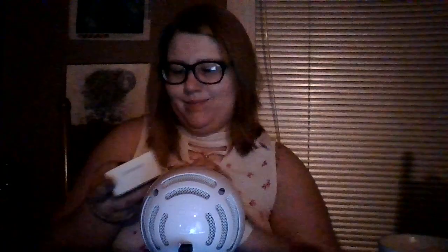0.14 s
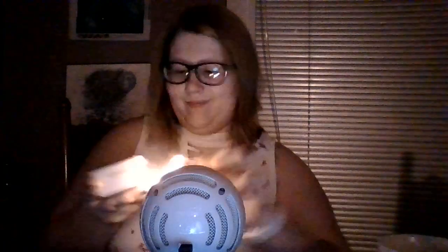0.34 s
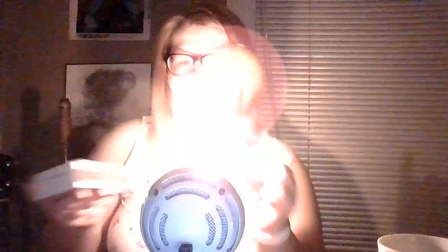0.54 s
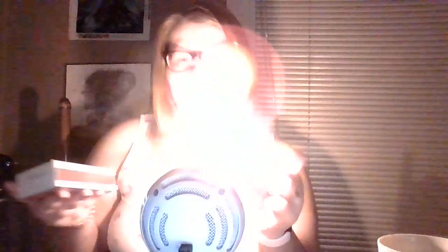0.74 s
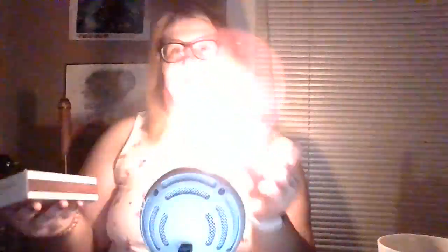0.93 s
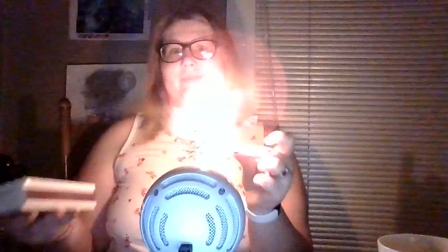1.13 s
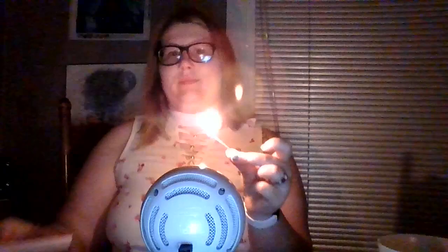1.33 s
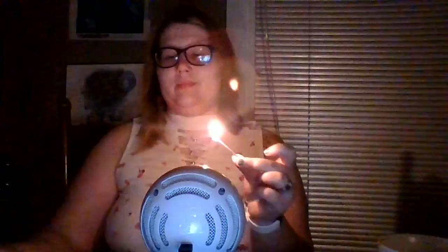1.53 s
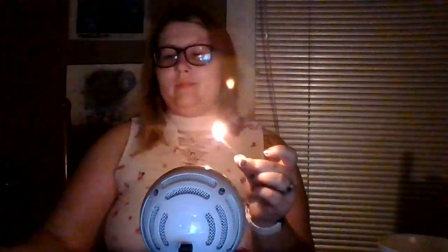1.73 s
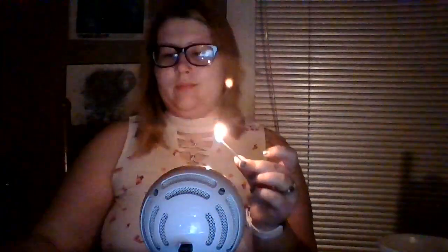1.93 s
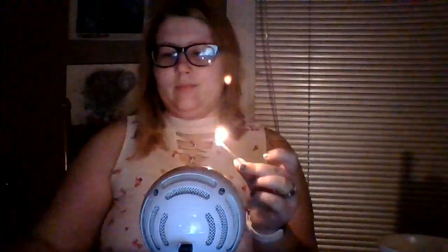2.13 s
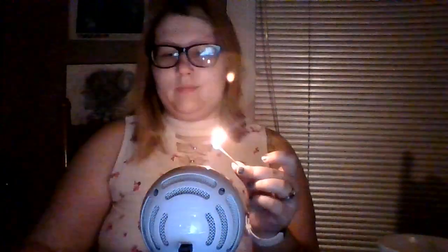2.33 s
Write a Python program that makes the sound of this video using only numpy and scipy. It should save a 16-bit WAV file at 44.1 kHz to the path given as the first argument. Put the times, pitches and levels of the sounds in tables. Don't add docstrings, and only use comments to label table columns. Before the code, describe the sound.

Close to the microphone in a quiet, humming room, a match scrapes quickly over grit, snaps alight with a pop, fizzes and spits for under a second, then matches rattle and the box thumps onto a table.

```python
import sys
import numpy as np
from scipy import signal
from scipy.fft import rfft, irfft
from scipy.io import wavfile
from scipy.ndimage import uniform_filter1d

SR = 44100
rng = np.random.default_rng(int(sys.argv[2]) if len(sys.argv) > 2 else 0)


def decibels_to_gain(level_db):
    exponent = np.asarray(level_db, float) / 20
    return 10 ** exponent


def materialize(psi):
    bounded = np.clip(np.atleast_2d(psi).T, -1, 1)
    quanta = np.round(bounded * 32767).astype(np.int16)
    wavfile.write(sys.argv[1], SR, quanta)


N = 103635
T = np.arange(N) / SR


def noise():
    return rng.standard_normal(N)


def evened(x):
    return x / np.sqrt(np.mean(x ** 2) + 1e-30)


def read(points, hz):
    f, value = np.transpose(points)
    return np.interp(np.log(hz + 1), np.log(f + 1), value)


def coloured(x, points, extra=0):
    hz = np.fft.rfftfreq(N, 1 / SR)
    low_cut = np.minimum(hz / points[0][0], 1) ** 2
    gain = decibels_to_gain(read(points, hz)) * low_cut * (hz < 16000) * (1 + extra)
    return evened(irfft(rfft(x) * gain, N))


def level(curve):
    s, db = np.transpose(curve)
    return decibels_to_gain(np.interp(T, s, db, left=-150, right=-150))


def ring(start, hz, db, t60, rise=0.0049):
    t = np.maximum(T - start, 0)
    return decibels_to_gain(db - 60 * t / t60) * (1 - np.exp(-(t / rise) ** 2)) * np.sin(2 * np.pi * hz * t)


def burst(start, fall, rise=0.000597):
    t = np.maximum(T - start, 0)
    return (1 - np.exp(-(t / rise) ** 2)) * np.exp(-t / fall)


def arch(start, length):
    return np.sin(np.pi * np.clip((T - start) / length, 0, 1)).clip(0)


def grains(per_s, spread_db):
    size = decibels_to_gain(spread_db * np.minimum(rng.exponential(1, N), 4)) * noise()
    return size * (rng.random(N) < per_s / SR)


def resonate(x, hz, width):
    turn = np.exp(2j * np.pi * hz * T)
    r = np.exp(-np.pi * width / SR)
    return 2 * (turn * signal.lfilter([1 - r], [1, -r], x / turn)).real


def resonate_twice(x, hz, width):
    return resonate(resonate(x, hz, width), hz, width)


def slow(span):
    size = max(int(span * SR), 2)
    return evened(uniform_filter1d(uniform_filter1d(noise(), size), size))


# pitch_hz, width_hz, depth (0 to 1)
PATH_NOTCHES = [(1800, 400, .6), (3300, 300, .5), (5400, 500, .65), (10500, 300, .65), (12100, 300, .65)]


def shadowed(x):
    hz = np.fft.rfftfreq(N, 1 / SR)
    dips = [1 - min(depth, .95) / (1 + (2 * (hz - f) / w) ** 2) for f, w, depth in PATH_NOTCHES]
    return irfft(rfft(x) * np.prod(dips, axis=0), N)


# pitch_hz, time_to_fall_60_db_s
ROOM_FADE = [(200, .35), (1000, .45), (4000, .38), (12000, .16)]


def room(x):
    late = rng.standard_normal(SR) * (np.arange(SR) > 300)
    hz, t, z = signal.stft(late, SR, nperseg=256)
    tail = signal.istft(z * decibels_to_gain(-60 * t / read(ROOM_FADE, hz)[:, None]), SR, nperseg=256)[1]
    return signal.fftconvolve(x, tail / np.linalg.norm(tail))[:N]


# pitch_hz, level_db (rms)
HUM_TONES = [(59.2, -56.5), (118.4, -69), (177.6, -82.5), (242.2, -75.5)]
# pitch_hz, level_db (per Hz)
HISS_TONE = [(60, -2), (200, -11.5), (570, -23), (1100, -19.5), (2000, -32), (5500, -39.5), (7800, -37.5),
             (15600, -43)]
# pitch_hz, level_db (per Hz)
ECHO_TONE = [(180, -46), (300, -8), (493, -11), (851, -2), (1940, -14), (3040, -25), (8200, -33),
             (15600, -54)]


def background():
    hum = 0
    for hz, db in HUM_TONES:
        waver_db = 1.6 * slow(span=0.089)
        hum = hum + decibels_to_gain(db + 3 + waver_db) * np.cos(2 * np.pi * hz * T + rng.uniform(0, 2 * np.pi))
    hiss_db = -65.5 - 2 * (T < .222)
    hiss = decibels_to_gain(hiss_db) * shadowed(coloured(noise(), HISS_TONE))
    rumble = decibels_to_gain(-64) * evened(resonate_twice(noise(), hz=28, width=20))
    echo = decibels_to_gain(-55.5 - 136.5 * T) * coloured(noise(), ECHO_TONE)
    return hum + hiss + rumble + echo


# start_s, length_s, pitch_hz, level_db
LANDING = [
    (1.8004, .036, 130, -42),
    (1.806, .036, 64, -40),
]
# start_s, pitch_hz, level_db, time_to_fall_60_db_s
TABLE_SWAY = [
    (1.841, 48, -46, 0.26),
    (1.866, 28, -45, 0.62),
    (1.923, 124, -44, 0.19),
    (1.94, 42, -44, .3),
    (2.023, 23, -41, 1.5),
    (2.27, 21, -46, 1.7),
]


def table():
    thump = 0
    for s, length, hz, db in LANDING:
        thump = thump + decibels_to_gain(db) * arch(s, length) * np.sin(2 * np.pi * hz * (T - s))
    return thump + sum(ring(*row) for row in TABLE_SWAY)


# start_s, level_db (peak), pitch_hz, brightness_db
KNOCKS = [(1.133, -67, 1110, -8), (1.223, -59.5, 1080, -34.5), (1.287, -44.5, 866, -20.5),
          (1.29, -44.5, 790, -18), (1.346, -50, 1010, -26), (1.491, -54, 765, -14.5),
          (1.497, -50, 950, -23), (1.514, -53, 1069, -21), (1.742, -42, 1075, -46.5),
          (1.7952, -41.5, 1254, -17.5), (1.797, -40.5, 700, -45), (2.287, -77.5, 688, -8.5)]
# start_s, length_s, level_db
SLIDES = [
    (1.309, 0.056, -71.5),
    (1.402, 0.062, -74),
    (1.476, 0.062, -69),
    (1.839, 0.11, -61.5),
    (1.949, 0.074, -69.5),
    (2.026, 0.0667, -63),
    (2.16, 0.055, -67.5),
    (2.227, 0.091, -71.5),
]
# pitch_hz, level_db (per Hz)
CARDBOARD_TONE = [(240, -26), (400, -14), (1230, -5), (1720, -14.5), (1940, -6.5), (2370, -15),
                  (6040, -20.5), (8210, -19), (15600, -34)]


def handling():
    thud_noise = noise()
    tick = coloured(noise(), CARDBOARD_TONE)
    tick_s = .004
    out = decibels_to_gain(-52) * tick * burst(2.3482, tick_s)
    for s, db, hz, bright_db in KNOCKS:
        knock = thud_noise * burst(s, fall=.004, rise=.0008)
        body = resonate_twice(knock, hz, 330)
        body = body + .4 * resonate_twice(knock, 1180, 260)
        bright = decibels_to_gain(bright_db + 6) * tick * burst(s, tick_s)
        out += decibels_to_gain(db) * (body / abs(body).max() + bright)
    slide = sum(decibels_to_gain(db) * np.sqrt(arch(s, length)) for s, length, db in SLIDES)
    rustle = shadowed(coloured(grains(per_s=14000, spread_db=0.82), CARDBOARD_TONE))
    return out + slide * rustle * decibels_to_gain(1.5 * slow(span=.008))


# time_s, level_db
BURNING = [
    (.25, -48),
    (.36, -59.5),
    (.46, -58.5),
    (.70, -54),
    (.80, -56),
    (.812, -58.5),
    (.845, -59),
    (.908, -67.5),
    (.925, -81),
]
# pitch_hz, level_db (per Hz)
FIZZ_TONE = [(88, -45.5), (150, 1), (501, -6), (1250, -2), (1740, -8), (2660, -6.5), (5260, -12),
             (7040, -8.5), (15600, -15)]
# pitch_hz, width_hz, level_db
REFLECTIONS = [(1340, 390, -5.5), (2670, 67, -1.5), (4260, 140, -8), (4784, 86, 1), (7260, 350, -3.5),
               (8500, 120, -7.5), (8410, 130, -1.5), (9730, 120, -22), (11300, 490, -5.5), (13100, 46, -10)]
# start_s, level_db (peak)
SPIT_TIMES = [
    (0.4834, -46),
    (0.5294, -44),
    (0.6938, -42),
    (0.8474, -42.5),
    (0.9074, -43),
]


def flare():
    hz = np.fft.rfftfreq(N, 1 / SR)
    loudest_db = np.max(read(FIZZ_TONE, hz))
    peaks = 0
    for f, width, db in REFLECTIONS:
        height = decibels_to_gain(db - loudest_db - read(FIZZ_TONE, f))
        peaks = peaks + height / np.sqrt(1 + (2 * (hz - f) / width) ** 4)
    hiss = coloured(noise(), FIZZ_TONE, decibels_to_gain(-7.5) * peaks)
    spits = sum(decibels_to_gain(db - 10.5) * burst(s, fall=.003) for s, db in SPIT_TIMES)
    flicker = decibels_to_gain(slow(span=.006))
    return hiss * (level(BURNING) * flicker + spits)


# time_s, level_db
PRESSURE = [
    (.21, -53),
    (.222, -40),
    (.2235, -24.5),
    (.2295, -23),
    (.231, -14),
    (.2352, -18),
    (.237, -8.5),
    (.241, -9),
    (.2465, -29),
]
# pitch_hz, level_db
GRIT_TONE = [(150, -14), (450, -19), (1100, -11), (2200, -10), (4600, -6), (8300, -2), (10400, -7),
             (14300, -5)]
# pitch_hz, level_db
APPROACH_TONE = [(700, -14), (1100, 0), (2500, -6), (5000, -10), (15000, -24)]
# start_s, level_db
STICK_SLIPS = [
    (.2025, -36),
    (.2095, -29),
    (.2128, -26),
    (.2168, -28),
    (.2208, -26),
    (.2265, -32),
    (.2375, -29),
    (.2565, -32),
]
# pitch_hz, level_db, time_to_fall_60_db_s
BOX_TONES = [(800, -9, .025), (1050, 0, .028), (1200, 3, .028), (1400, -4, .025), (1730, -12, .02),
             (2400, -18, .02)]


def strike():
    start_s, start_db = PRESSURE[0]
    before = (T < start_s) * decibels_to_gain(start_db) * np.exp(-np.maximum(start_s - T, 0) / .008)
    afterburn = (T > .2465) * decibels_to_gain(-39) * np.exp(-np.maximum(T - .294, 0) / .012)
    push = level(PRESSURE) + before + afterburn
    grit = push * coloured(grains(per_s=24000, spread_db=1.5), GRIT_TONE)
    approach = decibels_to_gain(-40) * np.exp(-abs(T - .222) / .0095) * coloured(noise(), APPROACH_TONE)

    box = 0
    for s, db in STICK_SLIPS:
        for hz, mode_db, t60 in BOX_TONES:
            box = box + ring(s, hz, db + mode_db, t60, rise=.0012)

    pop = ring(.232, hz=310, db=-27, t60=.05)
    gust = decibels_to_gain(-34) * burst(.228, fall=.035, rise=.005) * evened(resonate_twice(noise(), hz=70, width=160))
    puff = gust - ring(.248, hz=16, db=-25, t60=.25)
    return grit + approach + pop, box, puff


def scene():
    scrape, box, puff = strike()
    near = scrape + shadowed(flare()) + handling()
    echoes = decibels_to_gain(-17.5) * room(near + decibels_to_gain(-0.5) * box)
    return (near + box + echoes + puff + table() + background())[None]


def top_cut(x):
    return signal.sosfilt(signal.butter(12, 15780, fs=SR, output="sos"), x)


def record(dry):
    knee = 1.5
    mix = knee * np.tanh(dry / knee)
    return top_cut(mix)


dry = scene()
out = record(dry)
materialize(out)
```